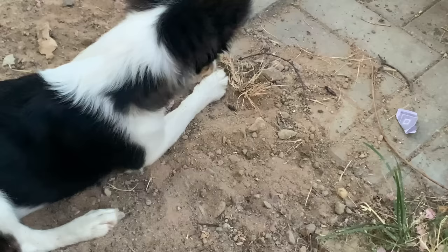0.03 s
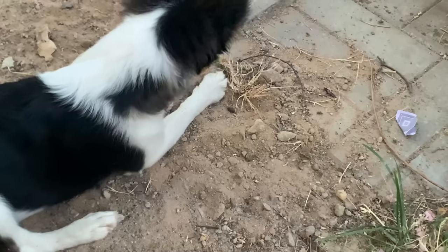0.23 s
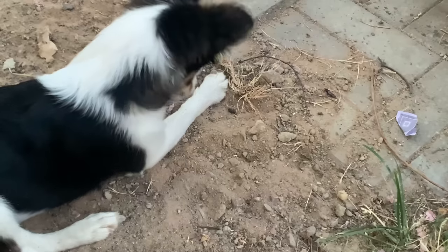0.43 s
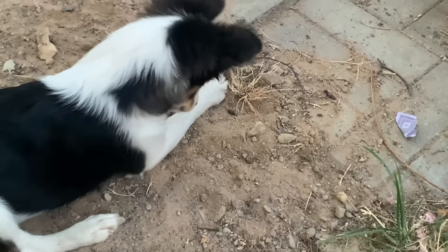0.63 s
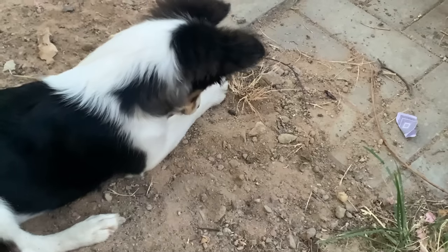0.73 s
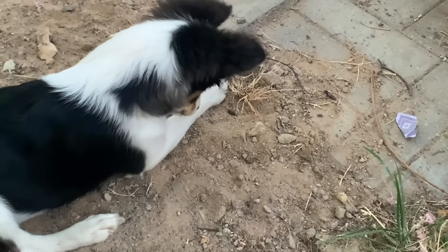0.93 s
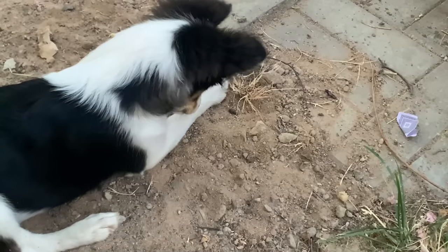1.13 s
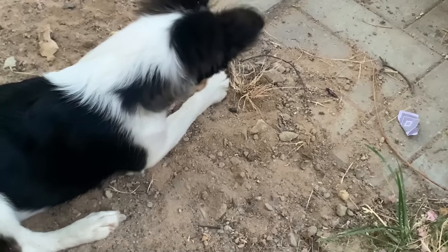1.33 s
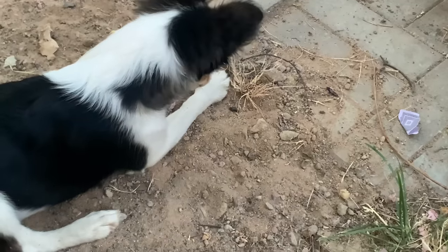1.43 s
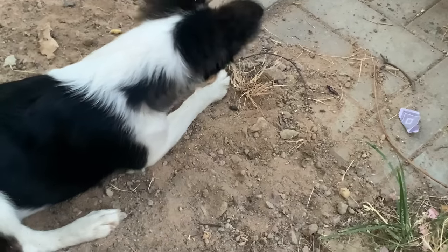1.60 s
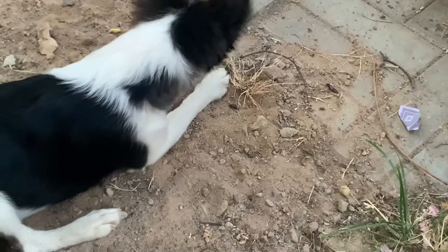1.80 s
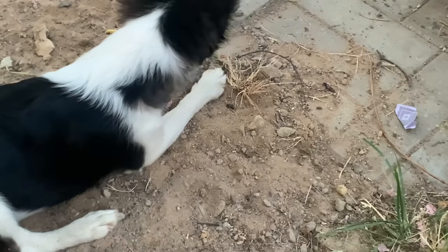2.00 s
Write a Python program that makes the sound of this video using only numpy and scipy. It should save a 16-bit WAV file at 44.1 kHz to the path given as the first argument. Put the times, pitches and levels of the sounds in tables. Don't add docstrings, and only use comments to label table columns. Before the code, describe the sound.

Close outdoor phone pickup of dog paws on loose soil, with early brushing and snaps, a quiet gap, a loud cracking slap with pattering crumbs, light ticks, then muffled pats and a very faint sniff above low distant traffic.

```python
import sys
import numpy as np
from scipy import signal
from scipy.fft import rfft, irfft
from scipy.io import wavfile

SR = 44100
rng = np.random.default_rng(int(sys.argv[2]) if len(sys.argv) > 2 else 0)


def to_linear_factor(level_db):
    exponent = np.asarray(level_db, float) / 20
    return 10 ** exponent


def generate_wav(signal):
    frames = np.transpose(np.atleast_2d(signal))
    scaled = np.clip(frames, -1, 1) * 32767
    pcm = np.round(scaled).astype(np.int16)
    wavfile.write(sys.argv[1], SR, pcm)


N = 90669
T = np.arange(N) / SR

# (time [s], level [dB], softness [dB per octave from 720 Hz])
CLOD_KNOCKS = [
    (.1765, -16.5, 12),
    (.772, -29, -1),
    (1.203, -25, 0),
    (1.248, 1, 2.5),
    (1.2607, -7.5, 7.5),
    (1.282, -16, 0),
]
# (frequency [Hz], level [dB], t60 [s])
CLOD_MODES = [(175, -32, 0.16), (485.7, -32.5, 0.1), (632, -29, 0.088), (727, -22.5, 0.09),
              (843, -29, 0.028), (940, -29, 0.085), (1093, -45, .05), (1428, -20, 0.027),
              (1582, -27, 0.067), (1743, -32, 0.053), (2710, -48, .03)]
# (frequency [Hz], density [dB per Hz])
SPRAY_SPECTRUM = [(130, -9), (300, -7), (700, -0.5), (1500, -9), (3000, -1.5), (5000, -12.5), (8000, -45),
                  (12000, -43)]
# (time [s], peak [dB], lowpass [kHz], decay [ms])
PATS = [
    (0.174, -39.5, 1.1, 3.3),
    (0.225, -54, 2.5, 3),
    (0.28, -43, 0.27, 5.1),
    (1.798, -46, 2.8, 6.1),
    (1.815, -37, 1.7, 6),
    (1.826, -35.5, 2.2, 5.4),
    (1.853, -36, 0.68, 8.2),
    (1.896, -28.5, 0.65, 4.7),
    (1.905, -44.5, 2.7, 36),
    (2.031, -38.5, 1.03, 7.2),
]
# (time [s], peak [dB], low part [dB], high part [dB], decay [ms])
TICKS = [(0.1526, -40, -40.5, 9.5, 1.5), (0.166, -39, -2, -2, .9), (0.1764, -39.5, -2, 8, 0.67),
         (0.2, -39, -22, 9, 1.36), (0.215, -48, -20, 12, 0.58), (0.227, -43, -15, 8, 0.92),
         (.243, -49, -12, -8, 1), (0.252, -50, -17, 14, 1), (0.2584, -20.5, -27, -2, 2.1),
         (0.281, -33, -6, -23, 1.3), (0.298, -46.5, -20, 8, 0.97), (0.3616, -23.5, -34, -2, 0.65),
         (0.368, -51, -17.5, 15, 1.2), (0.4231, -45.5, -29, 8, 1.4), (.614, -58.5, -14, 9.5, 1.2),
         (0.812, -43.5, 8, -2.5, 1.1), (0.821, -64, -10, 1, .9), (0.945, -51, -8, 6.5, .8),
         (.984, -54, 3, 2.5, 0.73), (1.1053, -41, 10.5, 7.5, 1.6), (1.1121, -44.5, 13, 6, 4.2),
         (1.19, -60, -10, 4, 0.82), (1.203, -52, -1, -14, 1.7), (1.2275, -41, -6, 5.5, 4),
         (1.3159, -44.5, -13, 3.5, 1.5), (1.375, -44, 5, -15, 2), (1.422, -44, 8.5, -4, 1.2),
         (1.426, -40.5, 8.5, -4, 2.6), (1.568, -48.5, -20, 15.5, 1.7), (1.58, -42, -15, 2, 3.5),
         (1.635, -43, 6.5, -2, 2.4)]
# (time [s], peak [dB], pitch [Hz], t60 [ms])
PEBBLES = [(.2005, -44, 6040, 8), (0.2287, -46, 1260, 11), (.2595, -19, 4270, 5.7),
           (0.281, -37.5, 3000, 18), (0.3606, -27.5, 4100, 8.7), (0.372, -45, 3880, 12),
           (.4238, -33, 6450, 9.8), (.429, -48, 3970, 10), (1.203, -52, 3600, 10), (1.236, -41, 1950, 14),
           (1.2426, -18, 1500, 10), (1.581, -46, 4700, 15), (1.8175, -36.5, 560, 45),
           (1.818, -40.5, 940, 49), (1.826, -39, 1970, 12), (1.855, -44, 990, 15), (1.897, -35, 1330, 12),
           (1.9055, -41.5, 2070, 20), (2.034, -34.5, 650, 27)]
# (time [s], level [dB], rise [s], hold [s], fall [s])
DRAGS = [(0.178, -46.5, 0.008, 0.038, 0.049), (0.225, -62, 0.0034, 0.0055, .02),
         (0.71, -52.5, 0.037, 0.032, 0.05), (1.189, -54, 0.0088, 0.014, 0.011),
         (1.215, -42.5, 0.027, 0.0022, .005), (1.27, -40, 0.0085, 0.013, 0.017),
         (1.301, -50.5, 0.0093, 0.027, 0.018), (1.351, -53.5, .005, 0.045, 0.038),
         (1.407, -51.5, 0.011, 0.027, 0.023), (1.557, -53.5, 0.0036, 0.011, 0.041),
         (1.995, -50, 0.019, 0.051, .02)]
# (frequency [Hz], density [dB per Hz])
SOIL_SPECTRUM = [(200, 1.5), (450, 3), (720, 0.5), (1100, -0.5), (1600, -1.5), (2400, -6), (4000, -6.5),
                 (8000, -40)]
# (time [s], level [dB], rise [s], hold [s], fall [s])
RUSTLES = [(0.133, -51, 0.013, 0.08, 0.045), (0.28, -61, 0.0078, 0.019, 0.032),
           (0.343, -59.5, 0.004, 0.034, 0.091), (0.594, -68.5, 0.025, 0.095, 0.056),
           (0.7, -60.5, 0.062, 0.018, 0.14), (0.92, -71, 0.014, 0.073, 0.12),
           (1.094, -68.5, 0.0063, 0.22, 0.033), (1.244, -62.5, 0.0065, 0.055, 0.047),
           (1.364, -58.5, .005, 0.018, 0.15), (1.414, -52, .008, 0.008, 0.011),
           (1.548, -60, 0.0039, 0.097, 0.024), (1.847, -62, 0.11, .14, .05)]
# (frequency [Hz], density [dB per Hz])
GRIT_SPECTRUM = [(1500, -8), (3000, 0), (4500, 2.5), (7000, 0), (8800, -1.5), (11000, -6.5), (14300, -14),
                 (15600, -10.5)]
# (frequency [Hz], width [Hz], level [dB])
NOSTRIL_WHISTLES = [(2030, 130, -3), (3730, 105, 0), (5840, 100, -6), (8170, 120, -19)]
# start [s], rise [s], hold [s], fall [s]
SNIFF_TIMES_S = (1.77, .15, .07, .05)
# (frequency [Hz], density [dB per Hz])
RUMBLE_SPECTRUM = [(28, -27), (45, -8), (66, 2.5), (95, -4.5), (130, -2.5), (190, -16.5), (330, -22),
                   (550, -30.5)]
# (frequency [Hz], density [dB per Hz])
AIR_SPECTRUM = [(500, 1), (900, -3.5), (1400, 2.5), (2200, 2), (2700, -6), (6000, -16), (11000, -18.5),
                (14500, -17)]
# (frequency [Hz], phase [rad])
PORT_PHASE = [(0, 0), (800, -1.3), (1700, -1.0), (2300, -2.9), (5200, -4.3), (6300, -6.3), (7300, -9.3),
              (8000, -10.1), (8700, -9.3), (10200, -6.3), (12000, -3.1), (13500, 0), (15000, 3.1),
              (16500, 3.8)]
# (frequency [Hz], power share [0..1])
FAR_ALIKE = [(100, 0.92), (300, 0.87), (650, 0.037), (5000, 0.033), (6500, 0.43), (8500, 0.04),
             (10800, 0.38), (11800, 1)]
# (frequency [Hz], level [dB])
PORT_BALANCE = [(60, -2), (400, -1), (1500, 0.5), (4500, 0), (7500, -4), (8700, -13), (10500, 0),
                (12000, -1)]


def rms_one(x):
    return x / np.sqrt(np.mean(x ** 2) + 1e-20)


def noise():
    return rng.standard_normal((3, N))


def at_hz(points, hz):
    table_hz, value = np.transpose(points)
    return np.interp(np.log(hz + 1), np.log(table_hz), value)


def drift(rate_hz):
    r = np.exp(-80 * np.pi * rate_hz / SR)
    white = rng.standard_normal(N // 40 + 2002)
    slow = signal.lfilter([1], [1, -2 * r, r * r], white)[2000:]
    return np.interp(np.arange(N) / 40, np.arange(len(slow)), rms_one(slow))


def cut(x, hz, kind, order=2):
    return signal.sosfilt(signal.butter(order, hz, kind, fs=SR, output="sos"), x)


def colour(x, spectrum, gain_of_band):
    hz = np.fft.rfftfreq(N, 1 / SR)
    below_table = (hz / spectrum[0][0]).clip(0, 1) ** 3
    shaped = rfft(x) * to_linear_factor(at_hz(spectrum, hz)) * below_table
    shaped = shaped / np.sqrt(np.mean(irfft(shaped, N) ** 2))
    place = 2 * np.log2(np.maximum(hz, 30) / 30)
    out = 0
    for k in range(20):
        band = irfft(shaped * (1 - abs(place - k)).clip(0), N)
        out = out + gain_of_band(30 * 2 ** (k / 2)) * band
    return out


def grains(per_s, spread_db, share):
    struck = rng.random(N) < per_s / SR
    sizes = to_linear_factor(spread_db * np.minimum(rng.exponential(1, N), 4)) * struck
    lumps = rms_one(signal.lfilter([1], [1, -.9], sizes))
    return noise() * np.sqrt(1 - share + share * lumps ** 2)


def stroke(start_s, db, rise_s, hold_s, fall_s):
    since = T - start_s
    rise = (since / rise_s).clip(0, 1) ** 2
    return to_linear_factor(db) * rise * np.exp(-(since - rise_s - hold_s).clip(0) / fall_s)


def resonance(x, hz, width_hz):
    r = np.exp(-np.pi * width_hz / SR)
    poles = [1, -2 * r * np.cos(2 * np.pi * hz / SR), r * r]
    return signal.lfilter(np.array([1, 0, -1]) * (1 - r * r) / 2, poles, x + 1e-18)


SLAP_S = 1.2447


def crack():
    level_db, hz, width_hz = -18.5, 2300, 1500
    lead_s, lead_db = .008, -28
    click = np.zeros((3, N))
    click[:, int(SLAP_S * SR)] = to_linear_factor(level_db) * SR / width_hz / 2 * np.array([.6, 1.2, 1.2])
    pulse = resonance(resonance(click, hz, width_hz), hz, 2 * width_hz)
    claws = rms_one(cut(noise(), [1200, 5500], "band", order=4))
    return 2.0 * cut(pulse, 3100, "low", order=4) + stroke(SLAP_S - lead_s, lead_db, lead_s, 0, 0.00033) * claws


def clod():
    out = np.zeros((3, N))
    for hz, mode_db, t60_s in CLOD_MODES:
        hits = np.zeros((3, N))
        for s, knock_db, soft_db in CLOD_KNOCKS:
            at = int((s + rng.uniform(0, .002) + 1.5 / hz) * SR)
            db = mode_db + knock_db - soft_db * abs(np.log2(hz / 720)) + rng.normal(0, 1)
            hits[:, at] = to_linear_factor(db) * np.array([1, .5, -.5])
        r, w = to_linear_factor(-60 / (t60_s * SR)), 2 * np.pi * hz / SR
        out += signal.lfilter([0, np.sin(w)], [1, -2 * r * np.cos(w), r * r], hits + 1e-18)
    return out


def spray():
    level_db, t60_s, faster_per_octave = -23.5, 0.18, 0.25

    def dying(hz):
        fall_s = t60_s * (hz / 1000) ** -faster_per_octave / np.log(1000)
        return stroke(SLAP_S - .003, level_db, 0.0029 + 4.2 / hz, 0, fall_s)

    return colour(grains(per_s=630, spread_db=1.3, share=0.13), SPRAY_SPECTRUM, dying)


def slap():
    return crack() + clod() + spray()


def pats():
    white = cut(noise(), 115, "high")
    puffs = 0
    for s, db, khz, ms in PATS:
        puffs = puffs + stroke(s, db - 5, 0.0008, 0, ms / 1000) * rms_one(cut(white, 1000 * khz, "low"))
    return puffs - resonance(puffs, 790, 290) + 0.43 * resonance(puffs, 850, 130)


def ticks():
    snap, hiss, rise_s, top_loss_db_per_ms = 3.35, 0.58, 0.00038, 8
    s, db, low_db, high_db, ms = np.transpose(TICKS)
    top_db = high_db - top_loss_db_per_ms * (ms - 1)
    bands = [(low_db, [1200, 3600]), (0, [3600, 5300]), (high_db, [5300, 10500]), (top_db, [10500, 16200])]
    snap_at = ((s + .0005) * SR).astype(int)
    white, out = noise(), 0
    for part_db, band_hz in bands:
        tails = sum(stroke(start, level, rise_s, 0, fall / 1000)
                    for start, level, fall in zip(s, db - 6 + part_db, ms))
        burst = hiss * white * tails
        burst[:, snap_at] += snap * to_linear_factor(db - 5 + part_db) * np.array([[1], [.7], [.3]])
        equal_power = np.sqrt(SR / 2 / (band_hz[1] - band_hz[0]))
        out = out + cut(burst, band_hz, "band", order=4) * equal_power
    return out


def pebbles():
    out = np.zeros(N + SR)
    age = np.arange(SR // 10) / SR
    for s, db, hz, t60_ms in PEBBLES:
        soft_onset = 1 - np.exp(-age * hz)
        ring = to_linear_factor(db - 60000 * age / t60_ms) * np.sin(2 * np.pi * hz * age) * soft_onset
        out[int(s * SR):][:len(age)] += ring
    return out[:N] * np.array([[.3], [1], [.6]])


def drags():
    crunch = colour(grains(per_s=1600, spread_db=2.9, share=0.27), SOIL_SPECTRUM,
                    lambda hz: to_linear_factor(0.95 * drift(15)))
    return sum(stroke(*row) for row in DRAGS) * crunch


def grit():
    crackle = colour(grains(per_s=1500, spread_db=3.0, share=.5), GRIT_SPECTRUM,
                     lambda hz: to_linear_factor(2.0 * drift(25)))
    return sum(stroke(*row) for row in RUSTLES) * crackle


def sniff():
    white, whistles = noise(), 0
    for hz, width_hz, db in NOSTRIL_WHISTLES:
        tone = resonance(resonance(white, hz, 2 * width_hz), hz, 2 * width_hz)
        whistles = whistles + to_linear_factor(db + 2.3 * drift(25)) * rms_one(tone)
    start_s, rise_s, hold_s, fall_s = SNIFF_TIMES_S
    return stroke(start_s, -65.5, rise_s, hold_s, fall_s) * whistles


def yard():
    rumble_db, air_db, patchy_db = -44.5, -60, 1.5
    together = drift(0.53)

    def breathing(hz):
        return to_linear_factor(patchy_db * (.5 * together + drift(15.0)))

    rumble = cut(colour(noise(), RUMBLE_SPECTRUM, breathing), 1080, "low")
    air = cut(colour(noise(), AIR_SPECTRUM, breathing), 15000, "low", order=8)
    return to_linear_factor(rumble_db) * rumble + to_linear_factor(air_db) * air


def ports(x, closeness):
    hz = np.fft.rfftfreq(N, 1 / SR)
    alike = at_hz(FAR_ALIKE, hz).clip(0, 1)
    alike = alike + closeness * (1 - alike)
    common, own_left, own_right = rfft(x)
    common = np.sqrt(alike) * common
    own = np.sqrt(1 - alike)
    turn = np.exp(.5j * np.interp(hz, *np.transpose(PORT_PHASE)))
    lean = to_linear_factor(at_hz(PORT_BALANCE, hz) / 2)
    left = lean * (common / turn + own * own_left)
    right = (common * turn + own * own_right) / lean
    return np.sqrt(2) * irfft(np.array([left, right]), N)


def scene():
    near = ports(slap() + pats() + ticks(), closeness=.8)
    ground = ports(pebbles() + drags() + grit(), closeness=0.3)
    far = ports(sniff() + yard(), closeness=0)
    return near + ground + far


def low_pass(x):
    return signal.sosfilt(signal.butter(12, 16500, fs=SR, output="sos"), x)


def record(dry):
    mix = signal.sosfilt(signal.cheby2(12, 70, 17000, fs=SR, output="sos"), dry)
    return low_pass(mix)


dry = scene()
out = record(dry)
generate_wav(out)
```